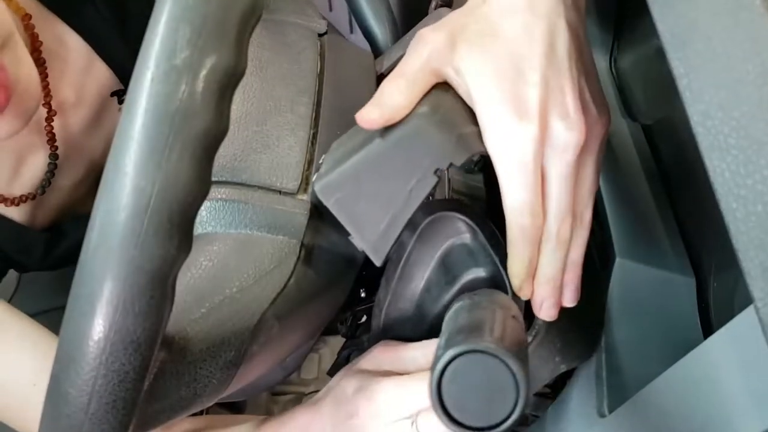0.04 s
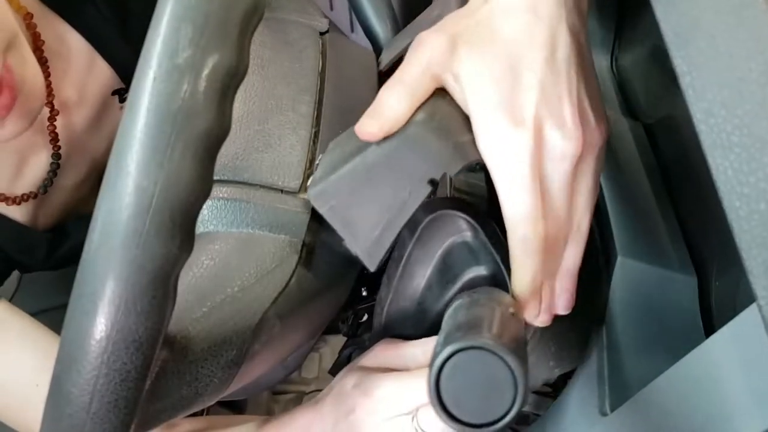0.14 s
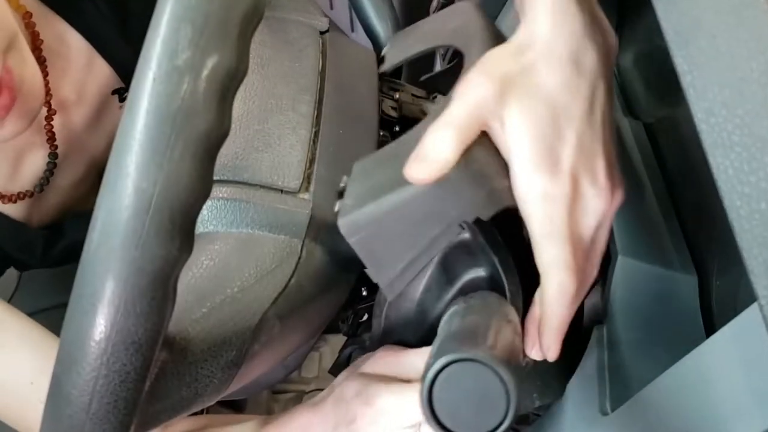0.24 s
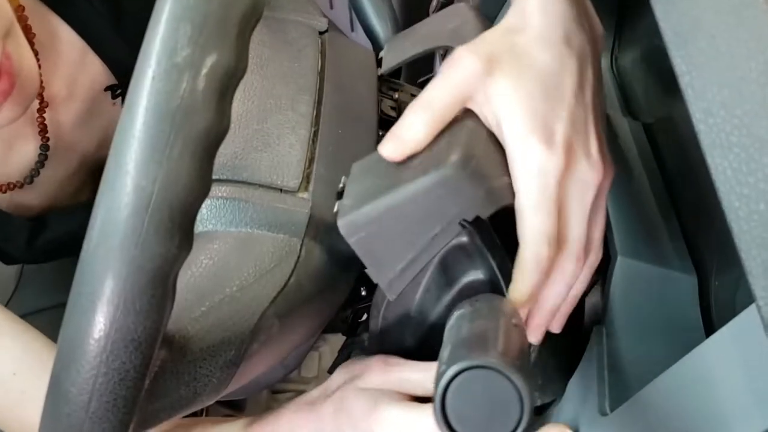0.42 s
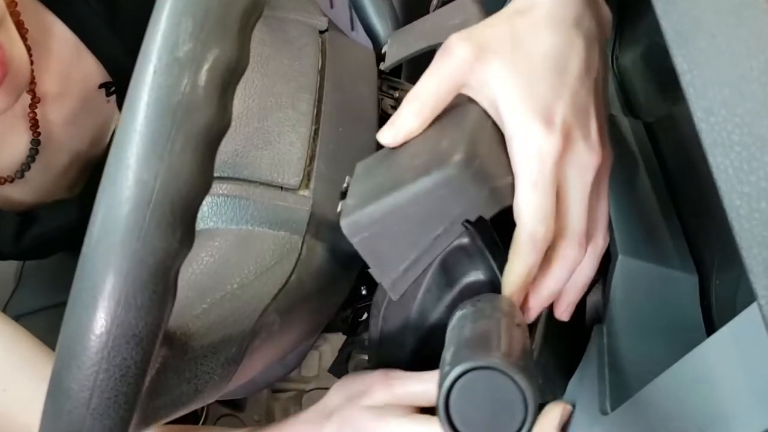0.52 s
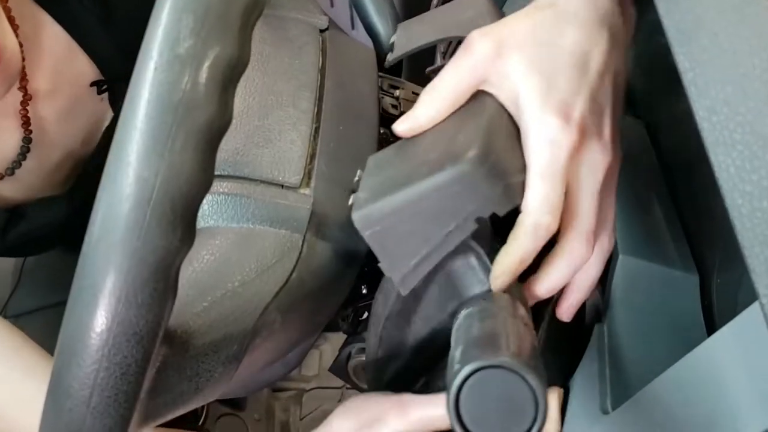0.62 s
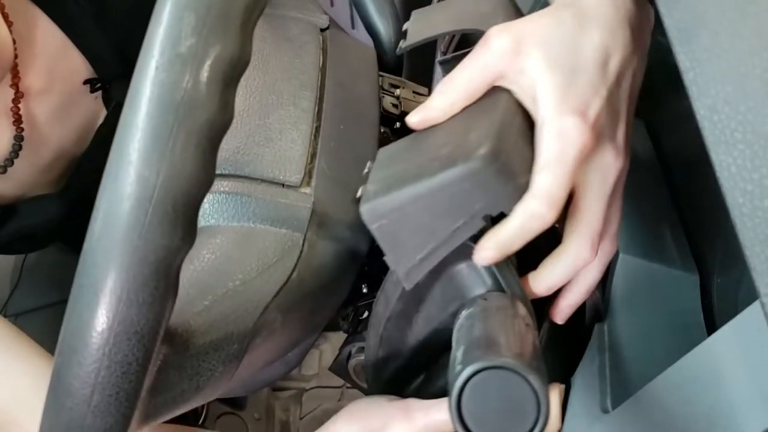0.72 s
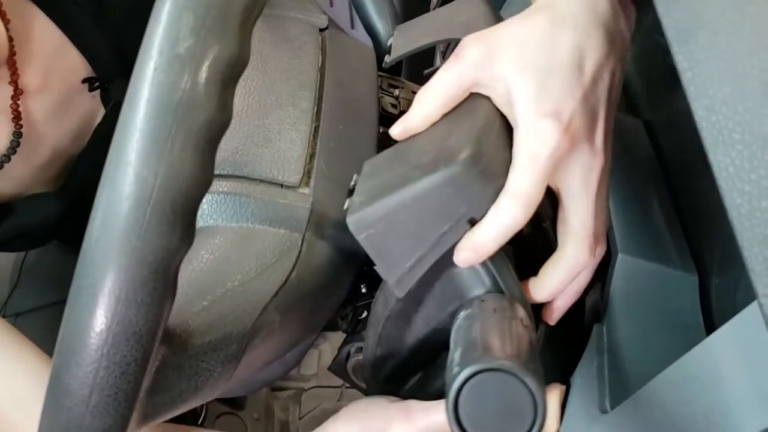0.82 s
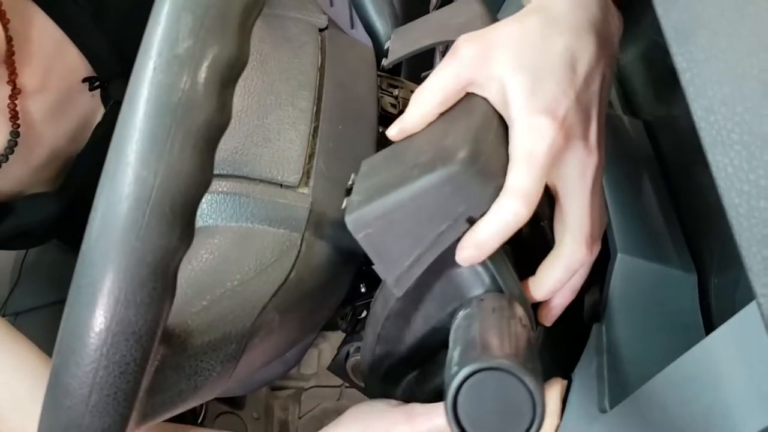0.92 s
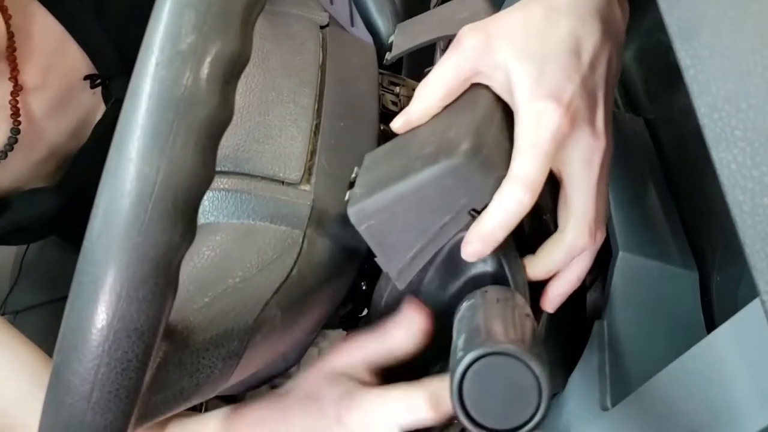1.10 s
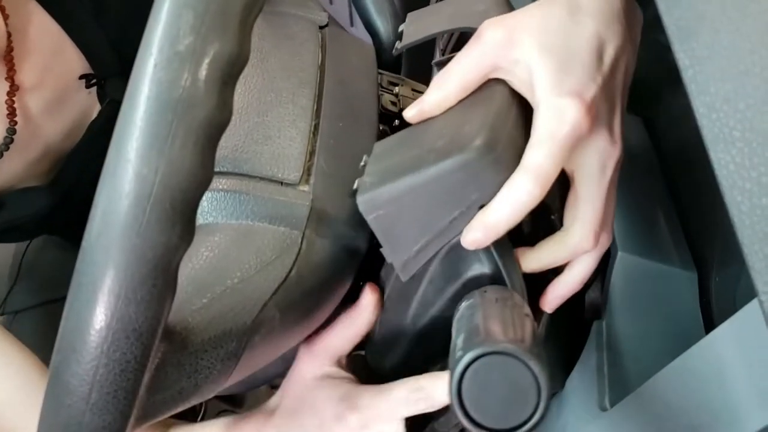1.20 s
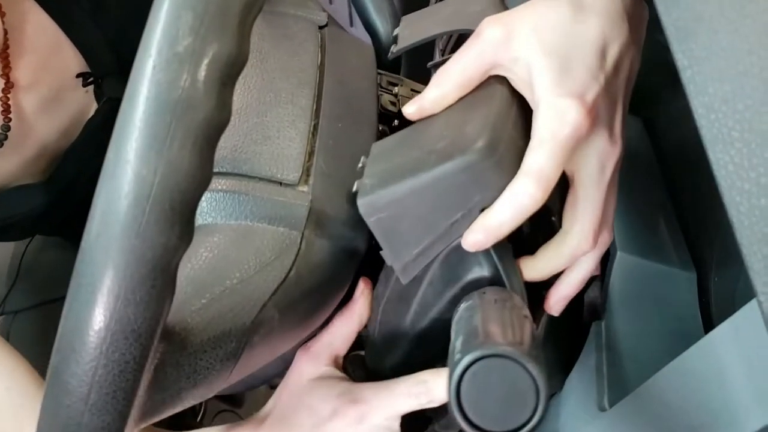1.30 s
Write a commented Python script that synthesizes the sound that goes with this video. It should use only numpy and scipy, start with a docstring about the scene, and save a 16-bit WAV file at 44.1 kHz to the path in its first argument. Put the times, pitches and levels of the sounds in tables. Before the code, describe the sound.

Hollow plastic trim is pressed into place, close and dry in a quiet vehicle cabin. Faint skin rubbing and small taps lead to a loud, hard double crunch at 0.2 to 0.25 seconds, with a low thud beneath. A quiet, rapid ticking creak runs from 0.38 to 0.6, ending in a light click near 0.63. Single hollow knocks follow at 0.8 and 1.19, among soft rubs and faint hiss.

```python
"""Plastic trim shell pressed home

Hands press a hollow plastic trim shell into place in a quiet vehicle cabin, close to a small microphone.
Taps and slips ring the shell's modes: knocks, two crunches as clips scrape home, a creak under load.
Skin rubs the plastic: fine slips ring the shell, noise hisses in the treble. A very high swish is noise.
Soft low thuds are decaying sines over a lumpy noise rumble and faint hiss; short dull echoes follow the shell.
"""
import sys
import numpy as np
from scipy import signal
from scipy.fft import rfft, irfft
from scipy.io import wavfile

SR = 44100
rng = np.random.default_rng(int(sys.argv[2]) if len(sys.argv) > 2 else 0)


def invert_db(x):
    """Field ratio 10**(x/20) for x, a level in decibels (scalar or array-like)."""
    u = np.asarray(x, float) / 20
    return 10 ** u


def to_wav(sig):
    """Store sig (one row per channel, or 1-D mono) as 16-bit WAV at the path in sys.argv[1].

    Samples outside -1..1 are clipped; the rate is SR.
    """
    pcm = np.clip(np.atleast_2d(sig), -1, 1) * 32767
    pcm = np.round(pcm).astype(np.int16)
    wavfile.write(sys.argv[1], SR, pcm.T)  # frames by channels


N = 59535


def evened(x):
    """Scales x to rms 1."""
    return x / np.sqrt(np.mean(x ** 2) + 1e-20)


def curve(table, column):
    """Joins a table column by straight lines in time."""
    rows = np.array(table, float)
    return np.interp(np.arange(N) / SR, rows[:, 0], rows[:, column])


def coloured(x, points):
    """Filters x by a response given as (f/Hz, level/dB); rms 1."""
    f_hz, level_db = np.transpose(points)
    bins_hz = np.fft.rfftfreq(len(x), 1 / SR)
    gain = invert_db(np.interp(np.log(bins_hz + 1), np.log(f_hz + 1), level_db))
    return evened(irfft(rfft(x) * gain, len(x)))


def add(mix, start_s, sound):
    """Mixes a sound in at start_s, cut at the end of the mix."""
    part = mix[round(start_s * SR):][:len(sound)]
    part += sound[:len(part)]


# shell modes: f/Hz, level/dB before spot weighting, t60/s before the cycle limit
SHELL_MODES = [(215, -6.5, 0.022), (348, 2.5, 0.048), (479.4, -3, 0.06), (618.4, 6, 0.022),
               (740.6, 4.5, 0.025), (829, 2, 0.02), (975, 0.5, 0.013), (1111.4, 4.5, 0.035),
               (1253, 6.5, 0.015), (1350, -9, 0.028), (1567, 5, 0.013), (1809, 4, 0.02), (2200, 1, 0.024),
               (2666, -1.5, 0.018), (3293, -3.5, 0.0094), (3650, -46.5, 0.017), (4380, -11.5, .03)]
LONGEST_CYCLES = 90  # held plastic dies within this many swings
GRIP_S = 0.0026  # time in which the pressing hand takes the first swings


def ring(centre_hz, octaves, contact_s=0.00018, scatter_rad=np.pi, lasting=1, left=1):
    """Shell's answer to a soft-edged tap: decaying modes weighted around the spot's favoured pitch; peak 1."""
    t = np.arange(4000) / SR
    phases = scatter_rad * (2 * rng.random(len(SHELL_MODES)) - 1)
    out = np.zeros(len(t))
    for (hz, db, t60_s), phase in zip(SHELL_MODES, phases):
        decay = invert_db(db - 60 * t / min(t60_s * lasting, LONGEST_CYCLES / hz))
        weight = np.exp(-0.5 * (np.log2(hz / centre_hz) / octaves) ** 2)
        out += decay * weight * np.sin(2 * np.pi * hz * t + phase)
    soft_edge = 1 - np.exp(-(t / contact_s) ** 2)
    grip = left + (1 - left) * np.exp(-(t / GRIP_S) ** 2)
    out = out * soft_edge * grip
    return out / abs(out).max()


def grains(per_s, spread_db):
    """Random slips of either sign, a few large; rms 1."""
    size = invert_db(spread_db * np.minimum(rng.exponential(1, N), 4)) * rng.choice([-1., 1.], N)
    return evened(size * (rng.random(N) < per_s / SR))


def scrape(shape, per_s, spread_db, centre_hz, octaves, lasting=1, count=5):
    """Slips at several spots, each ringing the shell in its own way."""
    taps = [ring(centre_hz, octaves, lasting=lasting) for _ in range(count)]
    out = np.zeros(N)
    for tap in taps:
        slips = shape * grains(per_s, spread_db)
        out += signal.oaconvolve(slips, tap / np.linalg.norm(tap))[:N]
    return out / np.sqrt(count)


# rubbing: t/s, shell level/dB, treble level/dB
RUB = [(0, -61, -77), (.02, -46, -73), (.056, -40.5, -63), (.085, -42, -57.5), (.108, -54.5, -75),
       (.14, -48.5, -61.5), (.163, -40, -64), (.19, -42, -63), (.29, -37, -62), (.318, -50.5, -75),
       (.35, -45.5, -60), (.39, -55.5, -80), (.45, -50.5, -65), (.545, -60, -68), (.585, -45.5, -61.5),
       (.62, -43, -59.5), (.645, -41, -60.5), (.685, -48, -61), (.71, -62, -68), (.9, -63, -77.5),
       (.97, -66, -97), (1.015, -49, -62), (1.045, -64, -72), (1.085, -45, -62.5), (1.115, -60, -68.5),
       (1.155, -70.5, -97), (1.2, -63, -67), (1.23, -61.5, -70.5), (1.26, -59, -62.5), (1.3, -93, -104),
       (1.335, -80.5, -81), (1.35, -66, -55.5)]
# rubbing colour: t/s, power share of the high modes (0-1)
RUB_BRIGHT = [(0, 0.14), (.07, 0.8), (.14, 0.84), (.165, 0.12), (.29, 0.04), (.35, 0.76), (.65, 0.53),
              (.9, 0.17), (1.02, 0.86), (1.1, 0.56), (1.35, 0.5)]
# skin hiss colour: f/Hz, relative density/dB per Hz
RUB_HISS = [(2000, -8), (3000, 7.5), (4400, 0), (6500, -4), (9000, -5.5), (12500, -9.5), (15000, -19.5),
            (16500, -13.5)]
RUB_GRAINS_PER_S, RUB_GRAIN_DB = 400, 4.5
RUB_LOW_HZ, RUB_HIGH_HZ, RUB_OCTAVES = 558, 1445, 0.54
RUB_LASTING = 1.6  # t60 factor: a stroking hand lets the high modes ring longer


def rubbing():
    """Fine slips ring the low or high modes of the shell; skin on plastic hisses in the treble."""
    share, level = curve(RUB_BRIGHT, column=1), invert_db(curve(RUB, column=1))
    low_shape, high_shape = level * np.sqrt(1 - share), level * np.sqrt(share)
    low = scrape(low_shape, RUB_GRAINS_PER_S, RUB_GRAIN_DB, RUB_LOW_HZ, RUB_OCTAVES)
    high = scrape(high_shape, RUB_GRAINS_PER_S, RUB_GRAIN_DB, RUB_HIGH_HZ, RUB_OCTAVES, RUB_LASTING)
    rough = rng.standard_normal(N) + 0.55 * grains(RUB_GRAINS_PER_S, RUB_GRAIN_DB)
    return low + high + coloured(rough, RUB_HISS) * invert_db(curve(RUB, column=2))


# rumble: t/s, level/dB
RUMBLE = [(0.0, -50.5), (0.232, -32), (0.402, -53.5), (0.808, -50), (0.92, -55.5), (1.104, -56.5),
          (1.21, -49.5), (1.35, -61)]
# rumble colour: f/Hz, relative density/dB per Hz
RUMBLE_COLOUR = [(12, -52), (20, -41.5), (64, 4.5), (129, -5.5), (216, -11.5), (255, -21.5), (400, -13.5),
                 (520, -45.5), (880, -120)]


def rumble():
    """Low noise whose level rises and falls in lumps."""
    return coloured(rng.standard_normal(N), RUMBLE_COLOUR) * invert_db(curve(RUMBLE, column=1))


# swish of cloth or skin: t/s, level/dB
SWISH = [(0, -106), (.16, -70), (.3, -76), (.35, -73), (.42, -98), (.6, -68), (.75, -68.5), (.95, -75),
         (1.04, -83), (1.1, -69), (1.15, -93.5), (1.225, -68), (1.3, -89.5)]
# swish colour: f/Hz, relative density/dB per Hz
SWISH_COLOUR = [(7000, -22.5), (10500, -8), (12500, -7.5), (15500, -11), (16500, -17.5)]


def swish():
    """Smooth, very high noise of cloth or skin."""
    return coloured(rng.standard_normal(N), SWISH_COLOUR) * invert_db(curve(SWISH, column=1))


# floor colour: f/Hz, relative density/dB per Hz
FLOOR_COLOUR = [(120, -45), (200, 7.5), (500, 3), (900, 6), (1300, -4.5), (1900, -15.5), (2500, -8.5),
                (3600, -23), (6000, -18), (12000, -25), (16000, -28)]
FLOOR_DB = -62


def floor_hiss():
    """Faint steady noise."""
    return invert_db(FLOOR_DB) * coloured(rng.standard_normal(N), FLOOR_COLOUR)


# crack colour: f/Hz, relative density/dB per Hz
CRACK_COLOUR = [(2500, 9), (4400, 5), (6500, -3.5), (9000, -7), (12000, -3.5), (15000, -12), (16500, -16.5)]
CRACK_T60_S = 0.031


def crack():
    """Short bright noise puff where hard edges meet."""
    t = np.arange(2000) / SR
    return coloured(rng.standard_normal(len(t)), CRACK_COLOUR) * invert_db(-60 * t / CRACK_T60_S)


# knocks, rebounds and the strongest slips of the two crunches:
# t/s, level/dB, favoured f/Hz, spread/octaves, crack level re hit/dB, contact/s
HITS = [(0.013, -32, 363, 0.16, -21.5, 0.0011), (.0475, -30.5, 850, 0.54, -41, 0.0022),
        (.126, -25.5, 1050, 0.54, -37, 0.0014), (.129, -28.5, 392, 0.65, -40, 0.0021),
        (0.159, -36.5, 2430, 0.61, -11.5, 0.00038), (.197, -14.5, 1230, 0.43, -24, 0.0012),
        (.2012, -6.5, 811, 0.99, -35, 0.0012), (.204, -11.5, 1350, 1.1, -24, .0005),
        (0.2277, -8, 1130, 0.444, -27, 0.00047), (.2302, -2.5, 1020, 0.56, -47, 0.0017),
        (.237, -1.5, 1210, 0.85, -25, 0.00096), (.2464, -5, 750, 0.32, -48, 0.00055),
        (.324, -30.5, 1280, 0.42, -40, 0.00095), (.366, -37, 1190, 0.37, -30, 0.0018),
        (0.609, -32.5, 2520, 1.05, -9.5, 0.0012), (0.6298, -20, 1990, 0.95, -17.5, 0.0014),
        (.6325, -27.5, 1010, 1.9, -8, 0.00075), (.8046, -12, 658, 0.68, -30.5, 0.00062),
        (0.8038, -27, 2440, 0.65, -22, 0.00039), (.8075, -14, 790, 0.3, -41, 0.001),
        (0.8175, -30.5, 404, 0.38, -40, 0.0019), (1.064, -41, 1110, 0.41, -22, 0.00074),
        (1.091, -44.5, 487, 0.085, -41, 0.0068), (1.1872, -33.5, 2200, 0.36, -13.5, 0.00046),
        (1.1885, -13.5, 526, 0.67, -38.5, 0.001), (1.1962, -33.5, 400, 0.55, -31, 0.001),
        (1.254, -48, 1300, 1.4, -5.5, 0.00022), (1.341, -39, 997, 0.44, -19, 0.0017)]
HIT_SCATTER_RAD = 0.3  # modes start nearly in step
GRIP_LEFT = 0.34  # share of a swing left by the pressing hand


def knocks_and_strong_slips():
    """Single taps and strong slips ring the shell; hard edges crack."""
    out = np.zeros(N)
    for start_s, db, hz, octaves, crack_db, contact_s in HITS:
        hit = ring(hz, octaves, contact_s, HIT_SCATTER_RAD, left=GRIP_LEFT)
        add(out, start_s, invert_db(db) * hit)
        add(out, start_s, invert_db(db + crack_db) * crack())
    return out


# low thuds: t/s, level/dB, f/Hz, rise/s, hold/s, t60/s
THUDS = [(0.19, -23, 88, 0.032, 0.0039, 0.13), (0.252, -35.5, 64.9, 0.037, 0.0099, 0.2),
         (0.322, -37, 54.5, 0.006, 0.018, 0.45), (0.629, -36, 165, 0.0025, 0.003, 0.08),
         (0.66, -30, 90, 0.0045, 0.035, 0.095), (0.864, -49.5, 97, 0.0059, 0.0069, 0.17),
         (0.899, -44.5, 53.6, 0.0081, 0.026, 0.32), (1.254, -49, 98, 0.015, 0.01, 0.051)]


def thuds():
    """Soft pushes swing the heavy panels: low sines that swell, hold and decay."""
    out, t = np.zeros(N), np.arange(SR // 2) / SR
    for start_s, db, hz, rise_s, hold_s, t60_s in THUDS:
        swell = np.sin(np.pi / 2 * np.minimum(t / rise_s, 1)) ** 2
        decay = invert_db(db - 60 * np.maximum(t - rise_s - hold_s, 0) / t60_s)
        add(out, start_s, swell * decay * np.sin(2 * np.pi * hz * t))
    return out


# dense slips of the crunches: t/s, rise/s, hold/s, level/dB, favoured f/Hz
CRUNCHES = [(0.195, 0.0082, 0.0011, -17.5, 1200), (0.224, 0.0098, 0.0092, -12, 1340)]
CRUNCH_FALL_DB_PER_S, CRUNCH_SLIPS_PER_S, CRUNCH_GRAIN_DB = 1109, 500, 0.28
CRUNCH_OCTAVES, CRUNCH_CRACK_DB = 1, -18.5


def crunches():
    """A clip scrapes home: a dense burst of slips that swells, holds and dies, with bright noise."""
    out, t = np.zeros(N), np.arange(N) / SR
    for start_s, rise_s, hold_s, db, hz in CRUNCHES:
        since_hold_s = np.maximum(t - start_s - rise_s - hold_s, 0)
        shape = np.clip((t - start_s) / rise_s, 0, 1) * invert_db(db - CRUNCH_FALL_DB_PER_S * since_hold_s)
        out += scrape(shape, CRUNCH_SLIPS_PER_S, CRUNCH_GRAIN_DB, hz, CRUNCH_OCTAVES)
        out += invert_db(CRUNCH_CRACK_DB) * shape * coloured(rng.standard_normal(N), CRACK_COLOUR)
    return out


# creak: t/s, slip level/dB
CREAK = [(.377, -31.5), (.397, -39), (.416, -30), (.455, -32), (.52, -36.5), (.55, -37), (.575, -35),
         (.598, -38)]
# creak: t/s, slip rate/Hz
CREAK_RATE = [(.3775, 52.2), (.455, 52.2), (.462, 68), (.487, 70), (.51, 80), (.53, 77), (.55, 70),
              (.6, 80)]
CREAK_HZ, CREAK_OCTAVES, CREAK_CRACK_DB = 1110, 0.55, -22
CREAK_UNEVEN_OCTAVES = 0.12  # between slip spots
CREAK_TICK_HZ, CREAK_TICK_DB = 4400, -55  # centres; the tick level is absolute


def creak():
    """Stick and slip at a mostly rising rate; pitch varies per slip, as do its high tick's delay and level."""
    t, out = np.arange(N) / SR, np.zeros(N)
    on = (t >= CREAK_RATE[0][0]) & (t <= CREAK_RATE[-1][0])
    turns = np.floor(np.cumsum(on * curve(CREAK_RATE, column=1)) / SR - 1e-9)
    level = invert_db(curve(CREAK, column=1))
    for i in np.flatnonzero(np.diff(turns, prepend=-1) > 0):
        spot, high, size, late = rng.standard_normal(size=4)
        slip_hz = CREAK_HZ * 2 ** (CREAK_UNEVEN_OCTAVES * spot)
        slip = ring(slip_hz, CREAK_OCTAVES, contact_s=0.0012, scatter_rad=1, left=GRIP_LEFT)
        add(out, t[i], level[i] * slip)
        add(out, t[i], level[i] * invert_db(CREAK_CRACK_DB) * crack())
        tick = ring(CREAK_TICK_HZ * 2 ** (0.15 * high), 0.3, lasting=0.4)
        add(out, t[i] + 0.001 * abs(late), invert_db(CREAK_TICK_DB + 3 * size) * tick)
    return out


CABIN_T60_S, CABIN_DB, CABIN_GAP_S, CABIN_TOP_HZ = 0.056, -17, 0.0023, 3440
CABIN_ECHOES_PER_S = 2000


def cabin(x):
    """Short dull echoes from glass and seats: sparse decaying impulses, low-passed."""
    t = np.arange(6000) / SR
    echoes = (rng.random(len(t)) < CABIN_ECHOES_PER_S / SR) * rng.choice([-1., 1.], len(t))
    tail = echoes * invert_db(-60 * t / CABIN_T60_S) * (t > CABIN_GAP_S)
    tail = signal.lfilter(*signal.butter(1, CABIN_TOP_HZ, fs=SR), tail)
    return invert_db(CABIN_DB) * signal.oaconvolve(x, tail / np.linalg.norm(tail))[:N]


def scene():
    """Sums all sources; only the shell's sounds get cabin echoes."""
    shell = rubbing() + knocks_and_strong_slips() + crunches() + creak()
    mix = shell + cabin(shell) + rumble() + swish() + floor_hiss() + thuds()
    return mix[None]


def top_cut(x):
    """Nothing passes above the cut-off."""
    return signal.sosfilt(signal.butter(12, 16250, fs=SR, output="sos"), x)


def record(dry):
    """The microphone rounds off the loudest peaks."""
    drive = 0.8
    mix = np.tanh(drive * dry) / drive
    return top_cut(mix)


dry = scene()
out = record(dry)
to_wav(out)
```